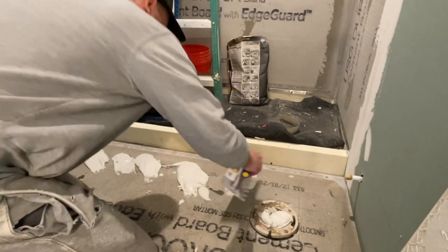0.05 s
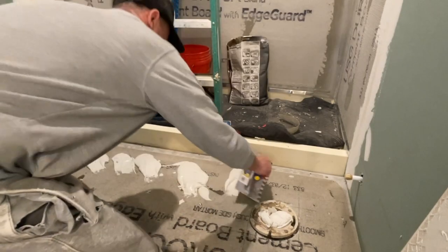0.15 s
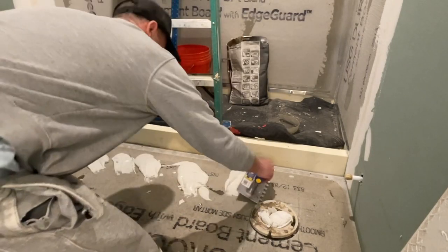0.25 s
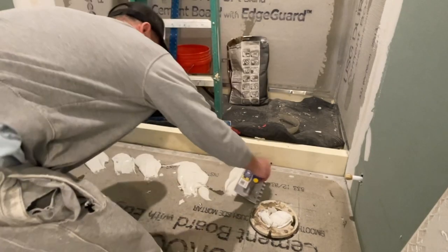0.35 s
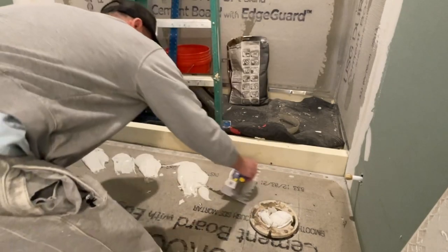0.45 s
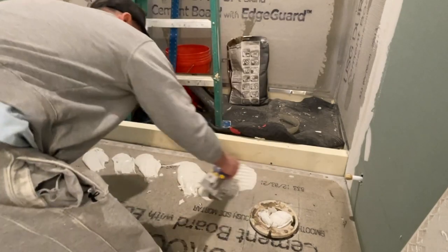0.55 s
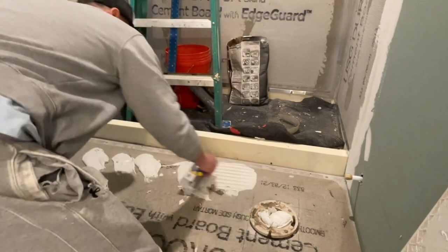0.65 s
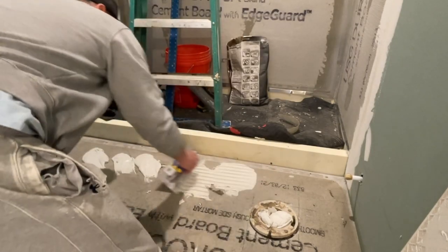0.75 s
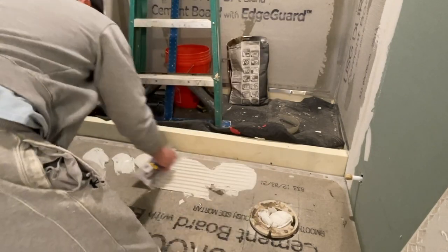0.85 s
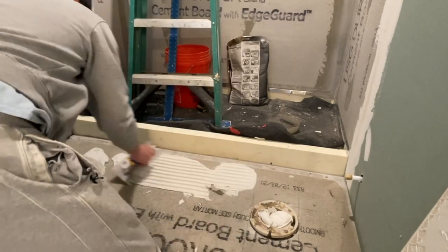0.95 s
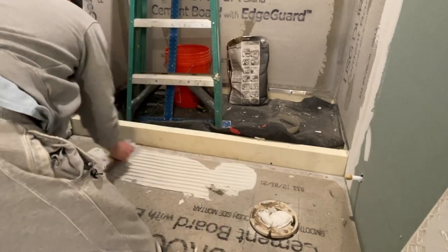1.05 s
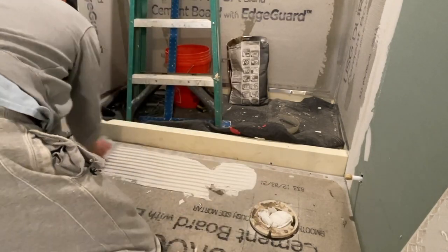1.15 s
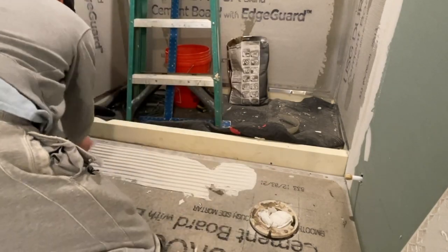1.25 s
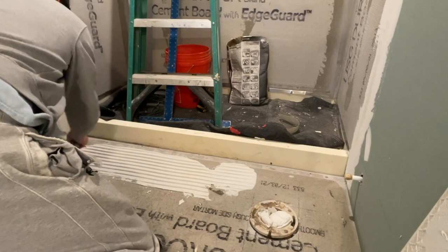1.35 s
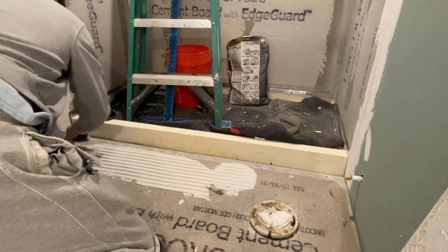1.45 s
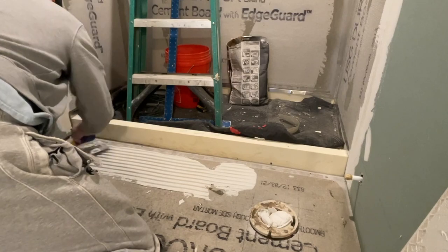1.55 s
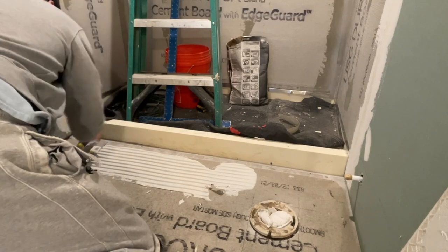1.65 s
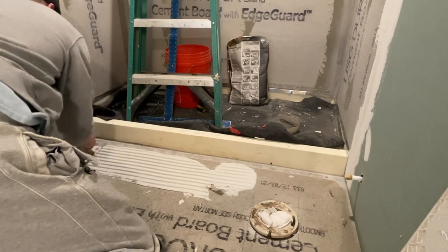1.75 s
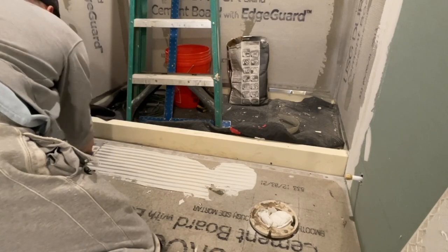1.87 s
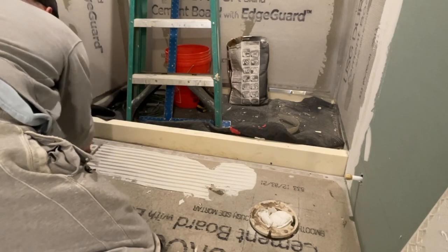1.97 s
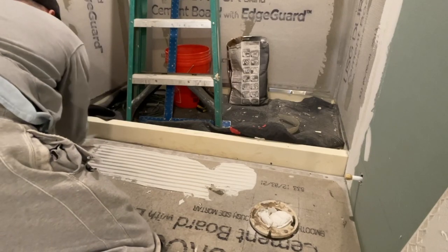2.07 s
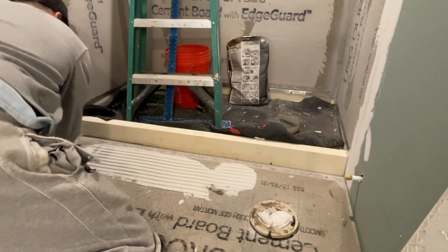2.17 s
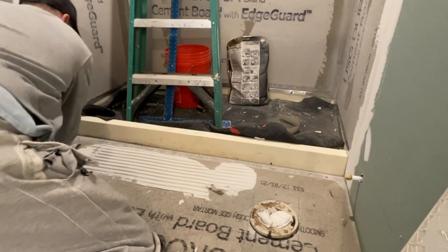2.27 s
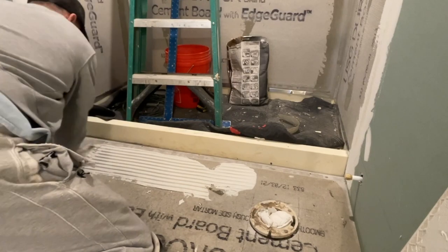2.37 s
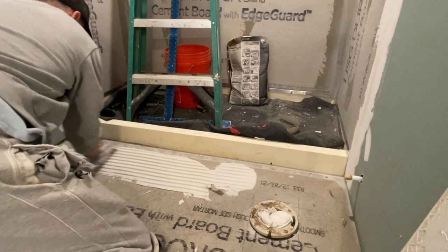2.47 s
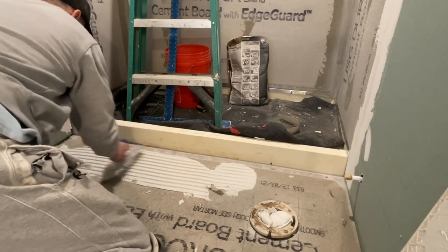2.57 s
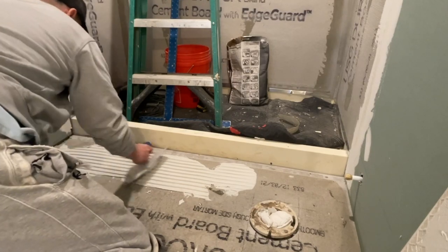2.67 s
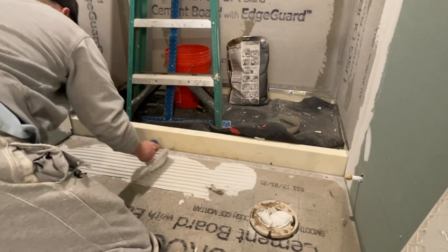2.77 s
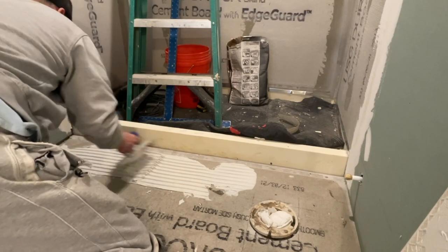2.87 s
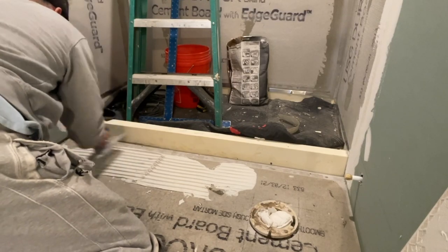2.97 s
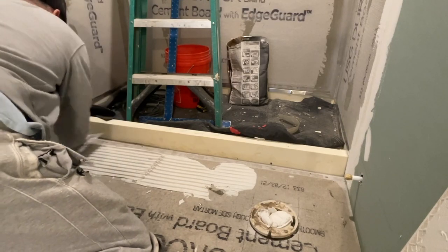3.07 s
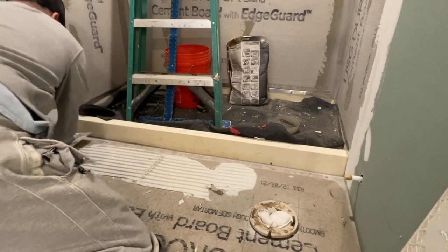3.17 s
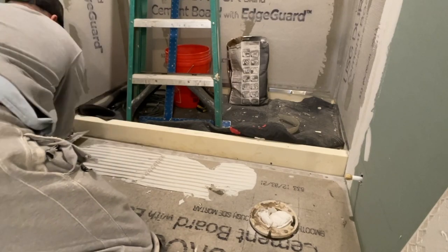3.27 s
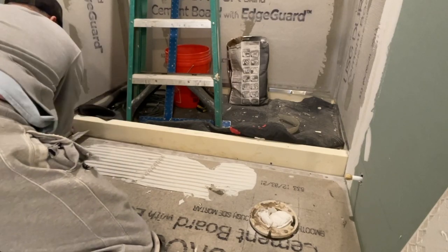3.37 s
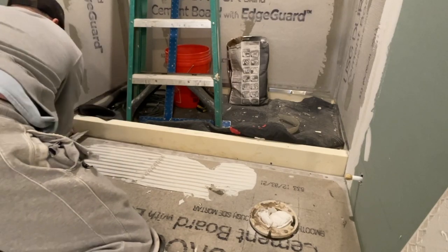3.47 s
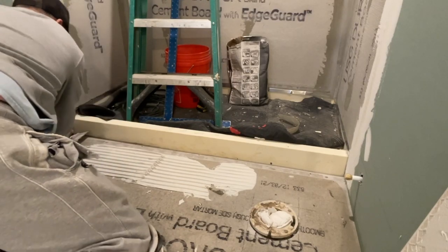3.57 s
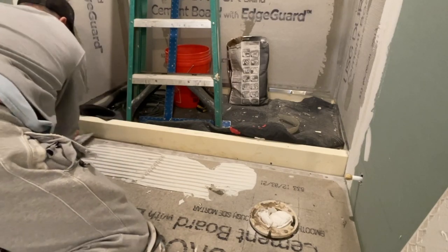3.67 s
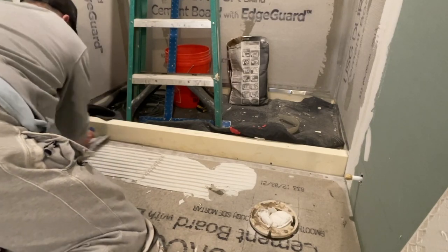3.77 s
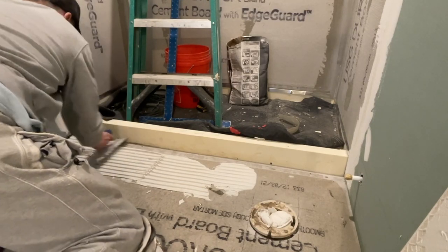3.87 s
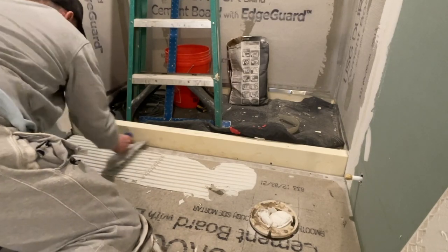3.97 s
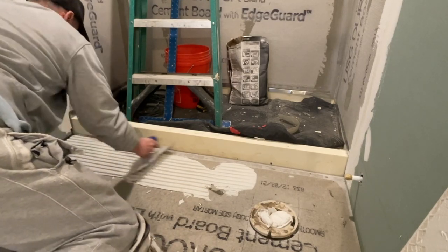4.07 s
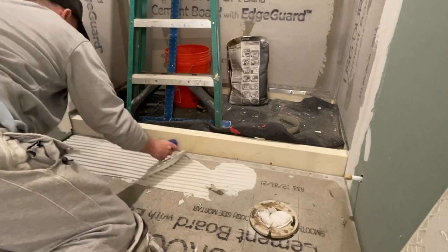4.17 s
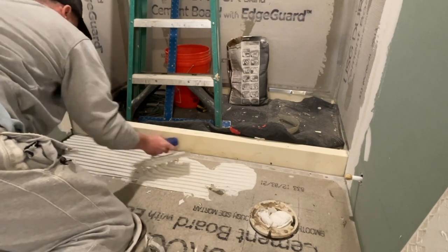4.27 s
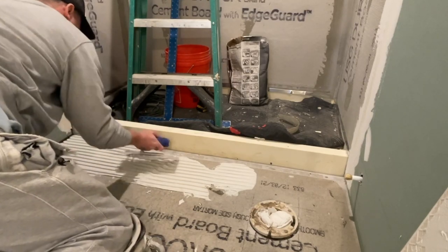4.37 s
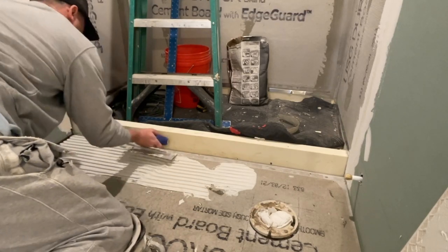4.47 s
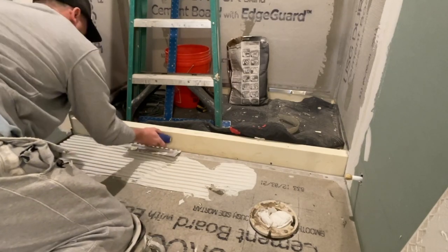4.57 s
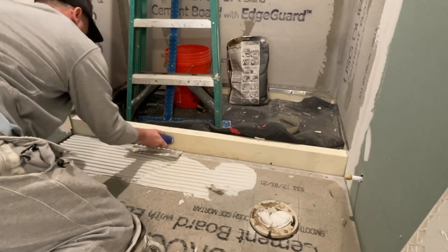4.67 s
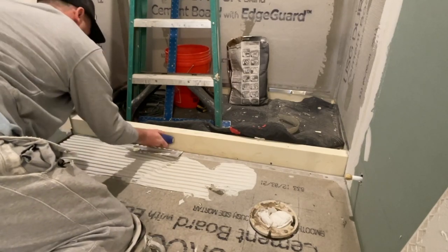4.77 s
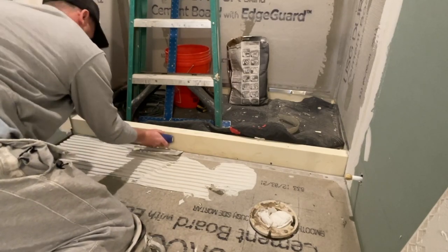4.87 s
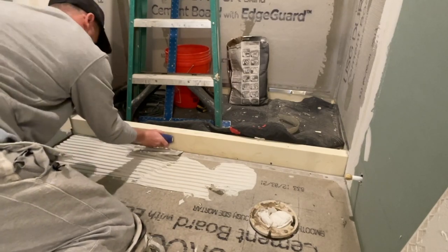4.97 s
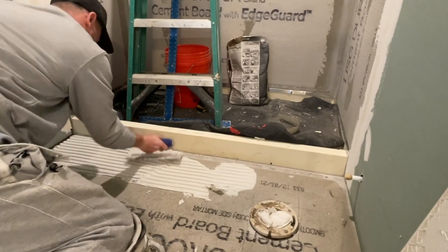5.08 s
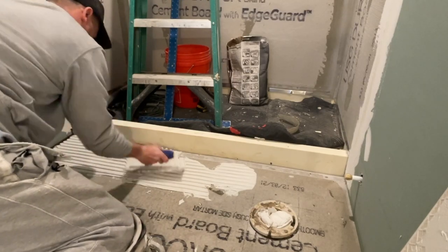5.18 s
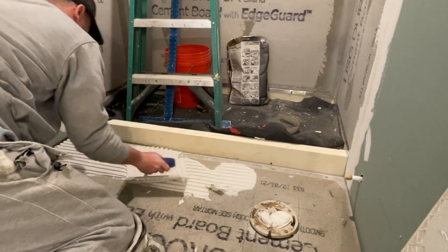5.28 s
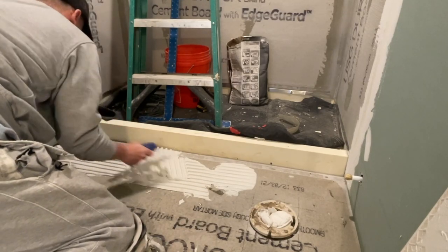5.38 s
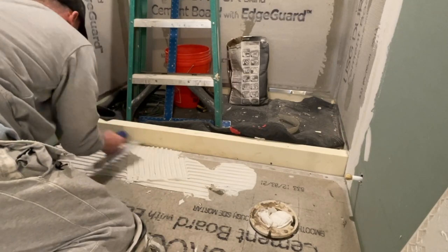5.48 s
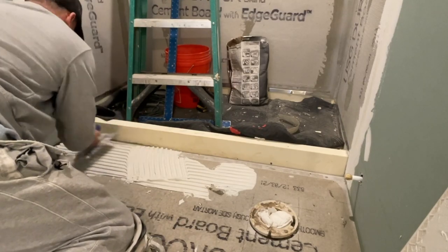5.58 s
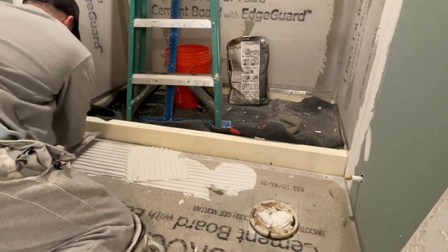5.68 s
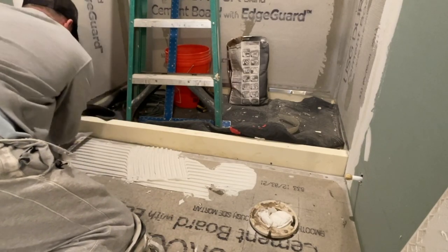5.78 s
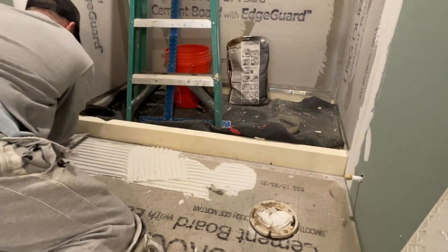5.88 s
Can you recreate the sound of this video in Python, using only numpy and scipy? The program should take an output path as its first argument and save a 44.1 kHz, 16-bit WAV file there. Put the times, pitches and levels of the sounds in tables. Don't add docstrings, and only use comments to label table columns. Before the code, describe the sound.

A steel notched trowel combs gritty mortar over a cement board floor in four rough scraping strokes, in a small bare hard-walled room.

```python
import sys
import numpy as np
from scipy import signal
from scipy.fft import rfft, irfft, next_fast_len
from scipy.io import wavfile
from scipy.ndimage import uniform_filter1d

SR = 44100
rng = np.random.default_rng(int(sys.argv[2]) if len(sys.argv) > 2 else 0)


def master_out(mix):
    frames = np.transpose(np.atleast_2d(mix))
    ceiling = np.clip(frames, -1, 1)
    pcm = np.round(ceiling * 32767).astype(np.int16)
    wavfile.write(sys.argv[1], SR, pcm)


def rack_gain(trim_db):
    fader = np.asarray(trim_db, float)
    return 10 ** (fader / 20)


N = 261513
T = np.arange(N) / SR


def unit(x):
    return x / np.sqrt(np.mean(x ** 2))


def shape(x, gain):
    size = next_fast_len(x.shape[-1] + 8192)
    f = np.arange(size // 2 + 1) * SR / size + 1e-3
    return irfft(rfft(x, size) * gain(f), size)[..., :x.shape[-1]]


def colour(points):
    hz, db = np.transpose(points)
    return lambda f: rack_gain(np.interp(np.log(f), np.log(hz), db))


def octave(f, centre_hz):
    return np.cos(np.pi / 2 * np.clip(np.log2(f / centre_hz), -1, 1))


def body(modes):
    def gain(f):
        total = 0
        for k, (hz, width, db) in enumerate(modes):
            total = total + (-1) ** k * rack_gain(db) * 1j * f * width / (hz ** 2 - f ** 2 + 1j * f * width)
        return total
    return gain


def walk(rate):
    k = int(SR / rate)
    steps = np.repeat(rng.standard_normal(N // k + 1), k)
    return 0.73 * uniform_filter1d(uniform_filter1d(steps, k), k)[:N]


def grains(per_s, spread_db):
    size = rack_gain(spread_db * np.minimum(rng.exponential(size=N), 2.5))
    return unit((rng.random(N) < per_s / SR) * rng.standard_normal(N) * size)


# (frequency [Hz], level [dB per Hz])
GRIT_HISS = [(710, -29), (1200, -7.5), (1280, -8), (1470, -8.5), (2750, -11.5), (3790, -9), (4970, -13.5),
             (5590, -11.5), (6780, -10.5), (7470, -14), (8230, -9.5), (10500, -15), (12900, -7.5),
             (15700, -18)]
# (frequency [Hz], width [Hz], level [dB])
BLADE_MODES = [(1130, 44, 2.5), (1210, 46, 4), (1297, 100, 2.5), (1426, 60, 1), (1558, 79, -3.5),
               (1822, 120, -2.5), (2112, 190, -9)]
# (frequency [Hz], width [Hz], level [dB])
BOARD_MODES = [(410, 160, -5.5), (512, 78, -2.5), (558.7, 36, 1.5), (644, 23, 4), (710.3, 50, 2.5),
               (922, 120, 0.5)]
# (frequency [Hz], width [Hz], level [dB])
JOIST_MODES = [(78, 22, -4), (126, 70, -5.5), (170.6, 29, 1), (261, 22, 1.5)]


def strokes():
    drag = rack_gain(-4.5 + 1.0 * walk(30))
    sand, lumps = grains(9000, 2.8), grains(2500, 6.5)
    teeth = sand + 4.4 * lumps
    blade_low, blade_high = body(BLADE_MODES[:2]), body(BLADE_MODES[2:])
    board_low, board_high = body(BOARD_MODES[:3]), body(BOARD_MODES[3:])
    # (clicks, body, level [dB], share of the weight, lean to the bend, flutter [dB])
    parts = [(sand, colour(GRIT_HISS), 0, 0, 0, 1.2),
             (teeth, blade_low, -2.62, 1.16, -1, 2.2),
             (teeth, blade_high, -3.12, 1.16, 1, 2.2),
             (lumps, board_low, -7 - spot(), 0.67, -0.3, 2.2),
             (lumps, lambda f: -board_high(f), -5.5 + spot(), 0.67, -0.3, 2.2),
             (grains(600, 3.9), body(JOIST_MODES), -18, 0.05, 0, 2.5)]
    sound = 0
    for clicks, gain, db, share, lean, flutter_db in parts:
        level = rack_gain(db + flutter_db * walk(24.786))
        push = clicks * drag * contact(share, lean) * level
        sound = sound + shape(push, gain) / np.std(shape(clicks, gain))
    return sound


# (time [s], drag [dB], weight on the blade [dB], blade bend towards the upper modes [dB])
STROKES = [
    [(0.26, -43.5, 4.5, 3), (0.314, -34, -8, 8.5), (0.42, -20.5, -11, 6), (0.58, -20, -1.5, 5.5),
     (0.69, -22, -5.5, 2), (0.87, -18, -3, -1), (0.95, -20.5, -11, -3.5), (1.126, -20.5, -10, -0.5),
     (1.27, -23.5, -5, -0.5)],
    [(2.26, -58.5, -2, -5.5), (2.308, -29.5, -12, 1.5), (2.39, -24, -5, -2.5), (2.568, -19.5, -6, 6.5),
     (2.7, -21, -1.5, -2), (2.765, -36.5, -3, 1)],
    [(3.575, -48, 4, -3), (3.602, -31.5, -5, 0.5), (3.72, -24.5, -9.5, -3), (3.868, -22, -6, -1),
     (4.084, -18, -7.5, 2), (4.14, -24.5, 0.5, 1.5), (4.18, -31, -1, 0)],
    [(4.85, -60, -1, 0), (4.9, -54.5, -2.5, -5), (4.978, -44, -21, -2), (5.002, -33, -13, -9),
     (5.072, -30.5, -9, 0), (5.142, -35.5, -17, -1), (5.18, -23.5, -8, 6), (5.275, -30.5, -5.5, -0.5)],
]
# (time [s], peak level [dB], rise [s], fade [dB per s], weight [dB])
SCUFFS = [
    (0.217, -20.5, 0.023, 699, 8),
    (2.226, -31, 0.033, 200.5, -1),
    (3.432, -56.5, .005, 150, 2.5),
    (3.485, -48.5, 0.066, 159.5, -3),
    (4.61, -62, 0.0021, 450, 1.5),
    (4.715, -51, 0.002, 193, -6),
    (5.762, -61.5, .002, 701, -5),
]


def contact(share, lean=0):
    force = 0
    for rows in STROKES:
        s, drag_db, weight_db, bend_db = np.transpose(rows)
        lifted = np.clip(T - s[-1], 0, None)
        drag = np.interp(T, s, drag_db + lean * bend_db) - 701 * lifted
        weight = np.interp(T, s, weight_db) + 26 * lifted
        force = force + rack_gain(drag + share * weight) * np.clip((T - s[0]) / 0.0086 + 1, 0, 1)
    for s, db, rise, fade, weight_db in SCUFFS:
        level = rack_gain(db + share * weight_db - fade * np.clip(T - s, 0, None))
        force = force + level * np.clip((T - s) / rise + 1, 0, 1) ** 2 * (T < s + 0.3)
    return force


BOARD_SPOTS = [1, -1.5, 1.5, 2]


def spot():
    starts = [rows[0][0] - 0.2 for rows in STROKES]
    return np.array(BOARD_SPOTS)[np.clip(np.searchsorted(starts, T) - 1, 0, None)]


def travel():
    start_db, end_db, wander_db = 1.5, 7, 5
    along = 0
    for rows in STROKES:
        first, last = rows[0][0], rows[-1][0]
        along = along + np.clip((T - first) / (last - first), 0, 1) ** 2.7 * (T < last + 0.3)
    return start_db + (end_db - start_db) * along + wander_db * walk(11)


# (time [s], peak level [dB], blade ring [dB], board knock [dB])
TAPS = [(0.1999, -18, -18, -41), (0.2127, -10.5, -28, -35), (0.2215, -37, 1, -46), (0.233, -36, -30, -27),
        (0.2499, -37, -32, -17), (0.2679, -39, -27, -35), (2.2215, -19, -44.5, -26),
        (2.24, -36, -31, -27.5), (3.4286, -47, -55, -57.5), (3.5776, -28, -44.5, -18),
        (4.6086, -48, -65, -61.5), (4.7126, -43, -65, -76.5), (4.724, -45, -60, -65),
        (4.7394, -45, -60, -60), (4.868, -48, -49, -62), (4.9028, -32, -54, -53),
        (4.9433, -26.5, -48, -57.5), (4.998, -26, -44, -46), (5.1786, -14.5, -22.5, -44),
        (5.7618, -51, -71, -52)]
# (frequency [Hz], level [dB])
TAP_CRACK = [(1500, -11.5), (3500, 8.5), (6000, -0.5), (14000, -1.5)]
# (frequency [Hz], width [Hz], level [dB])
STRUCK_BLADE = [(930, 50, -7), (1220, 140, -1.5), (1230, 86, -0.5), (1600, 88, -10.5), (3480, 360, -11),
                (3580, 47, -10)]


def taps():
    crack, blade, board = np.zeros((3, N + 2000))
    t = np.arange(2000) / SR
    for s, db, blade_db, board_db in TAPS:
        noise = rng.standard_normal(2000)
        i = int(s * SR)
        crack[i:i + 2000] += rack_gain(db - 7.0) * noise * np.exp(-t / 0.0015)
        blade[i:i + 2000] += rack_gain(blade_db + 7.5) * noise * np.exp(-t / 0.0023)
        board[i:i + 2000] += rack_gain(board_db + 4.0) * noise * np.exp(-t / 0.0021)
    knocks = shape(blade, body(STRUCK_BLADE)) + shape(board, body(BOARD_MODES))
    return (shape(crack, colour(TAP_CRACK)) + knocks)[:N]


# (time [s], peak level [dB], frequency [Hz], time to fade 60 dB [s])
THUDS = [(0.218, -20, 118.7, 0.15), (0.26, -28.5, 65, 0.36), (0.427, -42, 194, 0.27),
         (0.879, -31.5, 151.4, 0.12), (1.374, -25.5, 163, 0.11), (1.442, -41, 123, 0.21),
         (1.889, -45, 161.7, 0.13), (1.929, -54.5, 154.4, 0.13), (2.233, -29, 78.1, 0.12),
         (3.445, -45, 150, 0.19), (3.601, -40, 70, 0.5), (4.381, -49.5, 75.8, 0.27),
         (4.604, -55.5, 56.5, 0.19), (5.16, -35.5, 172, 0.32), (5.367, -43, 156.3, 0.13),
         (5.408, -38.5, 108.1, 0.1)]


def thuds():
    out = np.zeros(N)
    for s, db, hz, t60 in THUDS:
        t = np.clip(T - s, 0, None)
        swell = (1 - np.exp(-t / 0.0019)) * np.exp(-np.log(1000) * t / t60)
        out += rack_gain(db) * swell * np.sin(2 * np.pi * hz * t * (1 - 0.4 * t))
    return out


# (frequency [Hz], time to fade 60 dB [s])
ROOM_FADE = [(60, 0.37), (250, 0.31), (1000, 0.44), (4000, 0.35), (11000, 0.18)]


def echo():
    t = np.arange(int(0.8 * SR)) / SR
    hz, t60 = np.transpose(ROOM_FADE)
    tail = 0
    for centre in 45 * 2 ** np.arange(0, 9.):
        band = shape(rng.standard_normal((2, len(t))), lambda f: octave(f, centre))
        tail = tail + band * np.exp(-np.log(1000) * t / np.interp(np.log(centre), np.log(hz), t60))
    tail = tail * (1 - np.exp(-(t / 0.0028) ** 2))
    return tail / np.sqrt(np.sum(tail ** 2) / 2)


def room(x, count=5):
    place = (T / 0.12) % count
    out = 0
    for k in range(count):
        away = (place - k + count / 2) % count - count / 2
        near = np.cos(np.pi / 2 * np.clip(away, -1, 1))
        out = out + signal.fftconvolve((x * near)[None], echo(), axes=1)[:, :N]
    return out


# (time [s], opening level [dB])
GATE = [(0.0, -65), (0.18, -63), (1.5, -53), (1.88, -60.5), (1.97, -73.5), (2.15, -58.5), (2.93, -54),
        (3.17, -63), (3.42, -60.5), (4.3, -60), (4.5, -68.5), (4.586, -74.5), (4.62, -68), (4.84, -80),
        (4.9, -69), (5.5, -62.5), (5.73, -70.5), (5.93, -68)]
# (frequency [Hz], level [dB per Hz])
HUM = [(88, -38.5), (150, -8), (315, -10), (356, 0.5), (442, -13), (900, -13), (1220, -20.5), (1720, -18.5),
       (2800, -29.5), (6000, -32.5), (7800, -56), (13200, -120)]
# (frequency [Hz], level [dB per Hz])
CLOTH = [(1470, -28.5), (2500, -6.5), (3430, -10), (4220, -3.5), (5530, -13.5), (5980, -3), (10300, -10.5),
         (12700, -4), (15800, -16.5)]
# (peak time [s], peak level [dB], fade [s])
RUSTLES = [(0.02, -68.5, 0.46), (1.558, -85, 0.044), (1.78, -78, 0.039), (1.86, -71, 0.1),
           (2.04, -69.5, 0.052), (2.952, -73.5, 0.088), (3.198, -75, .15), (4.611, -73, 0.027),
           (4.725, -65.5, 0.064), (4.877, -53, 0.043), (5.449, -69.5, 0.044), (5.77, -74, 0.035)]
# (frequency [Hz], level [dB rms])
LIFTED_BLADE = [(1034, -79.5), (1357, -74)]


def background():
    gate_db = np.interp(T, *np.transpose(GATE))
    rubbing = rack_gain(gate_db - 18.5)
    for s, db, fade in RUSTLES:
        width = np.where(T < s, 0.39 * fade, fade)
        rubbing = rubbing + rack_gain(db) * np.exp(-((T - s) / width) ** 2)
    hum = 0
    for centre in 180 * 2 ** np.arange(0, 6.):
        waver = rng.standard_normal((2, N)) * rack_gain(1.5 * walk(19))
        hum = hum + shape(waver, lambda f: colour(HUM)(f) * octave(f, centre))
    rustle = shape(np.array([grains(6000, 2.5), grains(6000, 2.5)]), colour(CLOTH))
    rumble_modes = [(75.6, 47, 4.0), (120, 27, -10.0)]  # (frequency [Hz], width [Hz], level [dB])
    rumble = shape(rng.standard_normal(N) * rack_gain(2.0 * walk(3.2)), body(rumble_modes))
    ring = sum(rack_gain(db + 10.5) * np.sin(2 * np.pi * hz * T) for hz, db in LIFTED_BLADE)
    ring = ring * np.exp(-T / 0.4) * (T < 0.22)
    hiss = shape(rng.standard_normal(N), lambda f: np.exp(-((f - 13000) / 1500) ** 2))
    out = unit(hum) * rack_gain(gate_db + 2.5) + unit(rustle) * rubbing * rack_gain(1.5)
    out = out + unit(rumble) * rack_gain(-69.5 + 0.36 * (gate_db + 64.5))
    return out + ring + rack_gain(-82.5) * unit(hiss)


def scene():
    lag_s, echo_db = 0.000416, 1.72
    trowel = strokes() + taps()
    floor = thuds()
    pan_db = travel()
    left = trowel * rack_gain(pan_db / 2)
    right = shape(trowel * rack_gain(-pan_db / 2), lambda f: np.exp(-2j * np.pi * f * lag_s))
    return np.array([left, right]) + rack_gain(echo_db) * room(trowel + 0.55 * floor) + floor + background()


def top_cut(x):
    return signal.sosfilt(signal.butter(12, 16660, fs=SR, output="sos"), x)


# (frequency [Hz], width [Hz], level [dB])
HOUSING_DIPS = [(2880, 210, -1), (5560, 210, -6), (7500, 230, -5), (10520, 500, -2.5)]
# (frequency [Hz], half of left minus right [dB])
EARS = [(100, -1), (300, -2), (800, 1.32), (2400, 0.07), (5000, 2.5), (9000, 1.2), (11500, 0)]


def record(dry):
    mono_hz, joint_hz, top_hz = 260, 11200, 15800

    def housing(f):
        return rack_gain(sum(db * np.exp(-((f - hz) / width) ** 2) for hz, width, db in HOUSING_DIPS))

    def width(f):
        bass = 0.16 + 0.93 / (1 + (mono_hz / f) ** 4)
        return bass * np.clip((joint_hz - f) / 200 + 0.5, 0, 1)

    mid = shape(dry.mean(axis=0), lambda f: housing(f) * np.clip((top_hz - f) / 300, 0, 1) ** 2)
    side = shape((dry[0] - dry[1]) / 2, lambda f: housing(f) * width(f))
    left = shape(mid + side, colour(EARS))
    right = shape(mid - side, lambda f: 1 / colour(EARS)(f))
    return top_cut(np.array([left, right]))


dry = scene()
out = record(dry)
master_out(out)
```